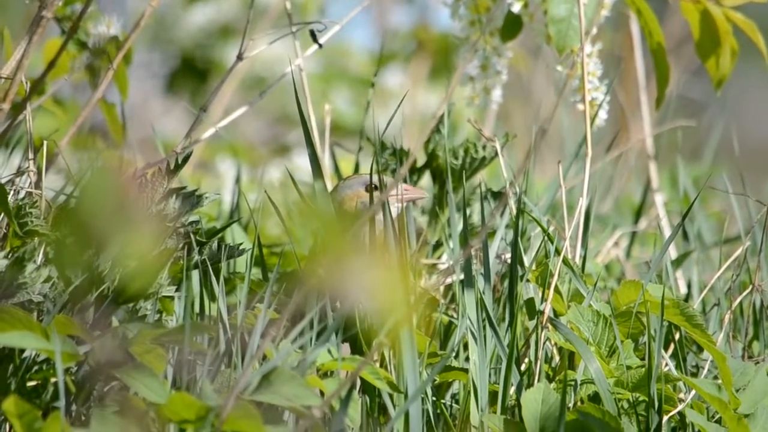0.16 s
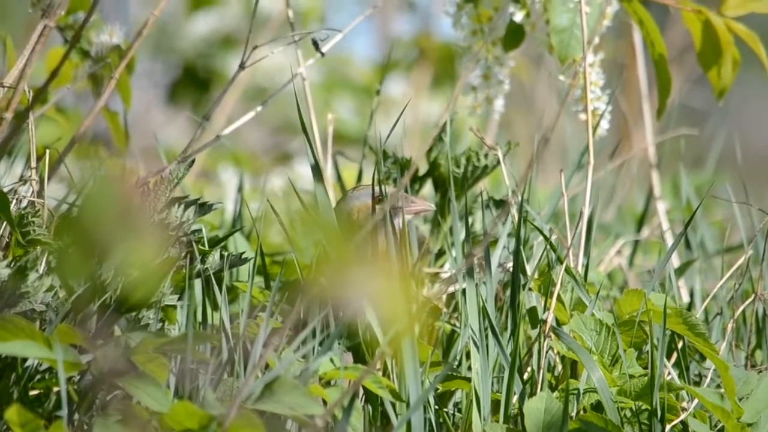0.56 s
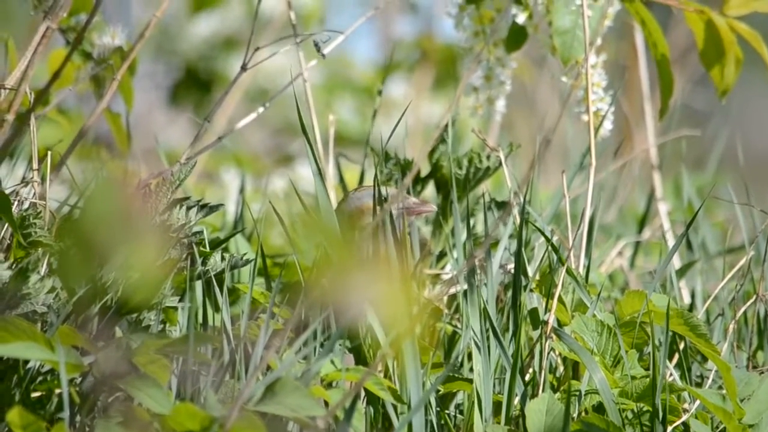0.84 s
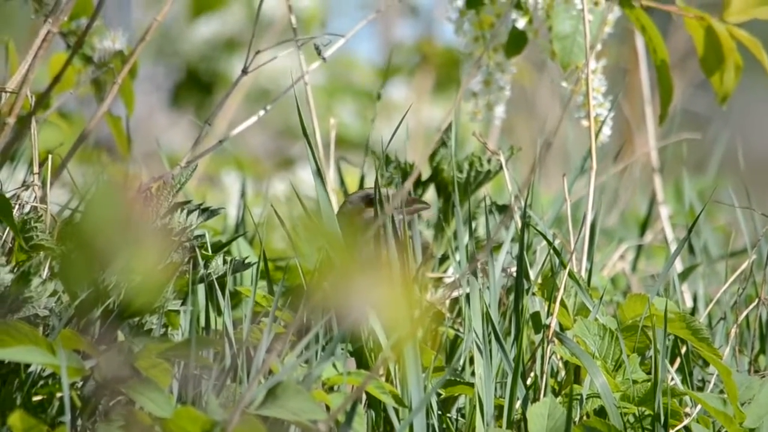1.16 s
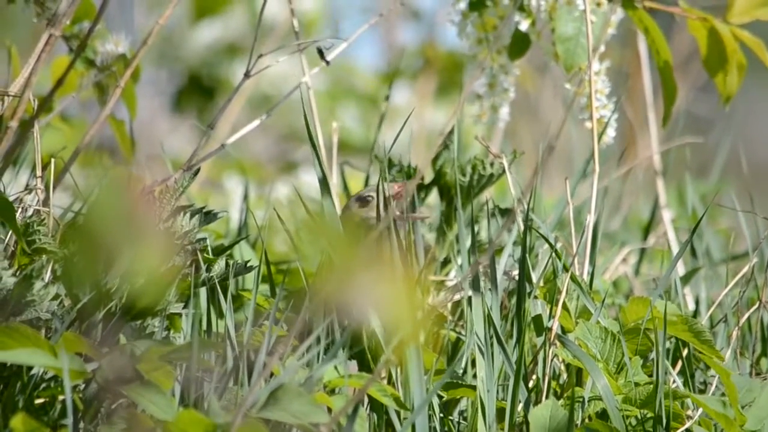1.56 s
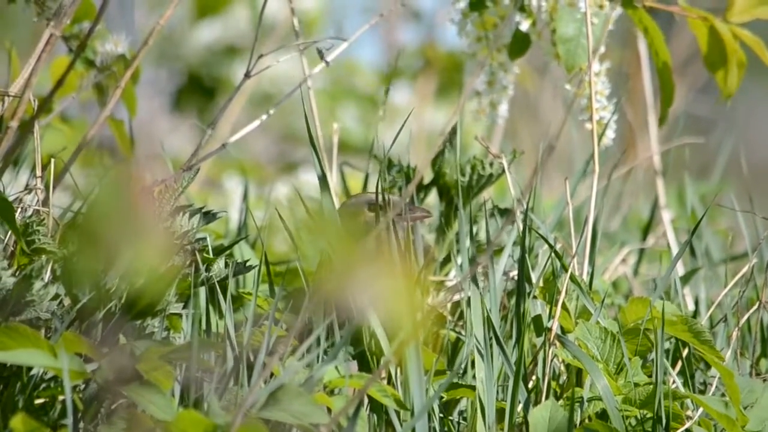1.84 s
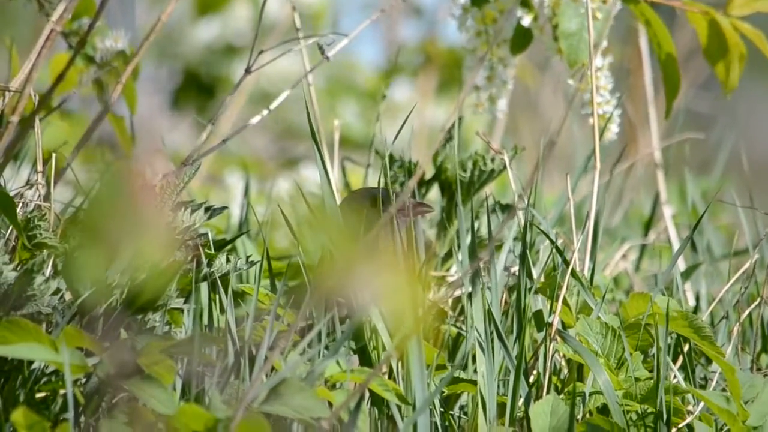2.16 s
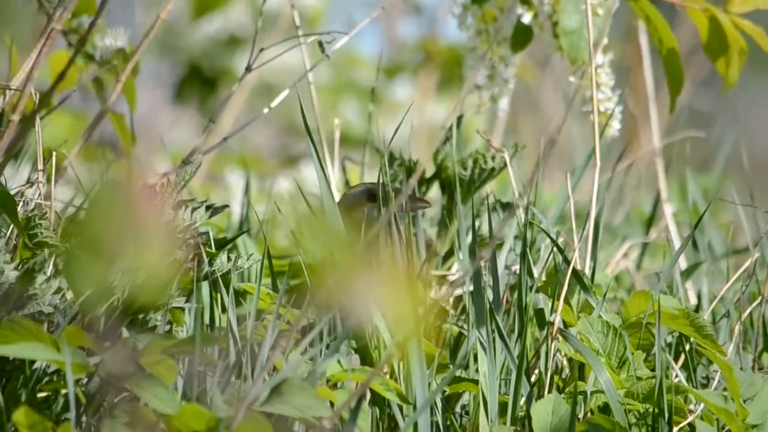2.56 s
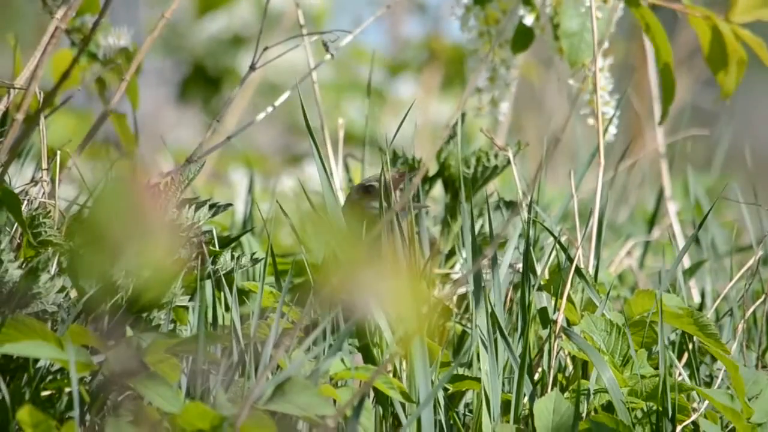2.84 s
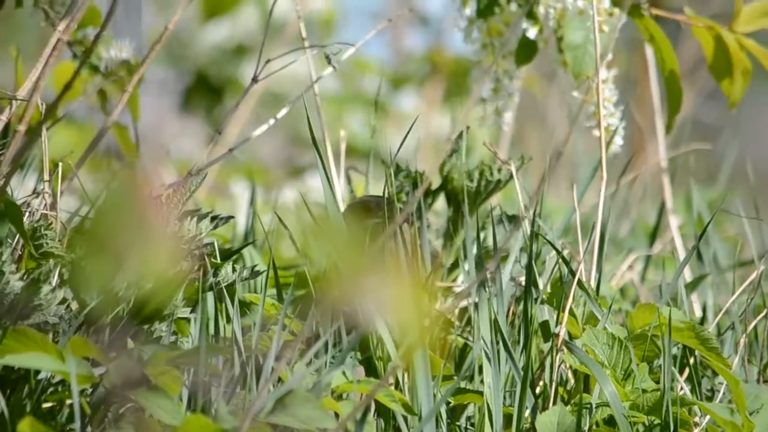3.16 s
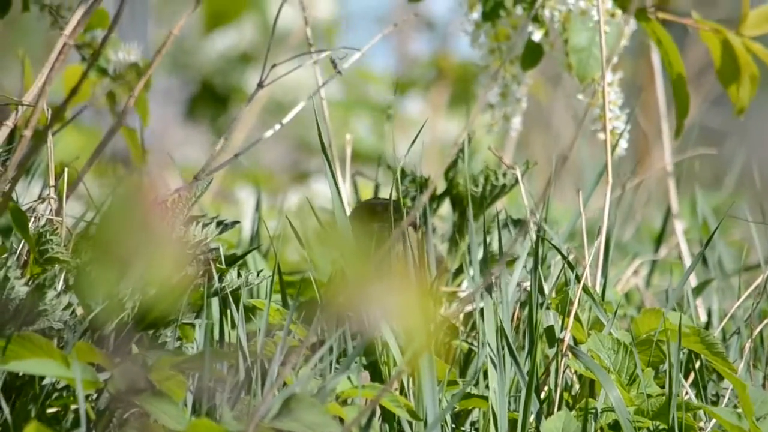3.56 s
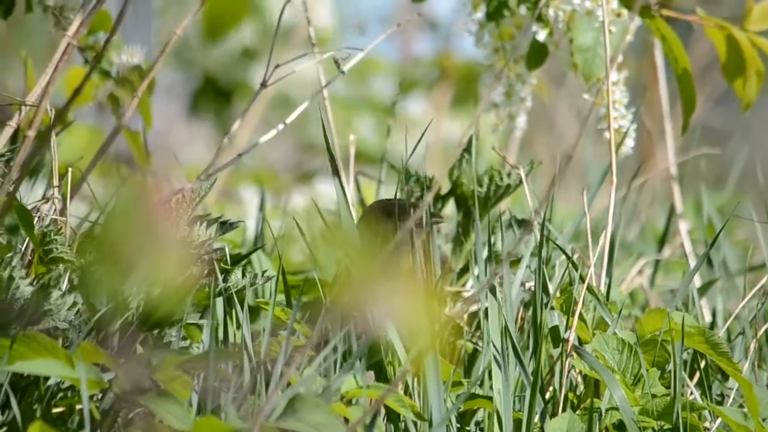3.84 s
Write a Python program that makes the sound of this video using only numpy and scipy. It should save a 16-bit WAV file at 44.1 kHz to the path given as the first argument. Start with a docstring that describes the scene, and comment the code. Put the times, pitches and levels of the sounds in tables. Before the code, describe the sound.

Dry, creaking rasps of a corncrake repeat six times over a quiet meadow hush.

```python
"""Corncrake in long grass

A corncrake rasps six calls: one alone, two pairs, then one more. Each is a limping run of about
twenty sharp double clicks that ring in the bird's throat and scatter among the stems. Behind it sit
a quiet outdoor hush, a few tiny chirps of a far bird and some soft low bumps."""
import sys
import numpy as np
from scipy import signal
from scipy.fft import rfft, irfft
from scipy.io import wavfile

SR = 44100
rng = np.random.default_rng(int(sys.argv[2]) if len(sys.argv) > 2 else 0)


def waveform_to_disk(signal):
    """Save audio, clipped to [-1, 1], as 16-bit WAV at the path in sys.argv[1]."""
    frames = np.transpose(np.atleast_2d(signal))
    scaled = np.clip(frames, -1, 1) * 32767
    samples = np.round(scaled).astype(np.int16)
    wavfile.write(sys.argv[1], SR, samples)


N = 176400

# Tone of the outdoor air: frequency_hz, gain_db
HUSH_EQ = [(25, -2), (60, -10.5), (100, -5), (160, -8), (350, -3), (650, -5), (1000, -7.5), (2200, -11),
           (2800, -13), (4200, -16.5), (4750, -14), (5300, -20), (6500, -21), (8200, -28.5), (9600, -29.5),
           (11000, -29)]
HUSH_DB, HUSH_WAVER_DB = -66, 1
# Soft low bumps: start_s, level_db, pitch_hz
LOW_BUMPS = [(.308, -54.5, 90), (0.899, -56, 104), (1.376, -58.5, 85.7), (1.874, -51, 100),
             (2.036, -49, 92)]
BUMP_RISE_S = .0034
# The far bird's chirps: start_s, length_s, first_hz, middle_hz, last_hz, level_db
FAR_CHIRPS = [(.540, .02, 3150, 2950, 2550, -66), (.670, .018, 3250, 2950, 2600, -65),
              (.864, .042, 4250, 4550, 5400, -68), (.897, .028, 5200, 5400, 5200, -69),
              (.982, .054, 4250, 3480, 4300, -65)]
# Tone of the scatter from the stems: frequency_hz, gain_db
GRASS_EQ = [(300, -6), (1200, -6.5), (2300, -0.5), (4000, -7.5), (6100, -6.5), (7500, -4.5), (10000, -3)]
GRASS_T60_S, GRASS_BUILD_S = .112, .0012
FAR_TAIL_DB, FAR_TAIL_T60_S = -50, .69

# The corncrake's calls: start_s, gain_db, mean_gap_ms, swell_db
CALLS = [(0.2742, -.1, 8.88, 3), (1.0429, -1.3, 8.89, 3.8), (1.5442, .9, 8.88, 3), (2.3305, -.9, 9.03, 4.3),
         (2.8276, 1.6, 8.89, 3), (3.6886, .4, 8.89, 3.5)]
# Length of each call: click_count
CLICKS_PER_CALL = [21, 19, 21, 19, 20, 19]
# The stumble that opens every call, against the mean gap: gap_ratio
STUMBLE_GAPS = [.70, .86, 1.24, .79, 1.19, .98, .97]
LIMP_DEPTH, LIMP_CLICKS, LAST_GAP_STRETCH, GAP_JITTER = .26, 10.5, 1.13, .025
SWELL_S, FADE_S, END_SLACK = .075, .035, .2
FIRST_CLICK_DB, CLICK_SPREAD_DB = -2, .92
REBOUND_MS, REBOUND_DB, REBOUND_JITTER = .81, -4.4, .025
BREATH_DB, BREATH_DECAY_MS = -18, .8
# Bands that lag within a click: centre_hz, width_hz
LAGGING_BANDS = [(2600, 900), (3600, 1100), (7600, 1500), (9300, 2200)]
# Throat resonances: centre_hz, width_hz, full_effort_gain_db, swell_db
THROAT_RESONANCES = [(992, 683, -23, -2), (1276, 220, -17.5, 0.5), (1874, 300, -9, -6.5),
                     (2293, 538, -19, -4.5), (3114, 324, -3.5, 4), (3895, 550, -14.5, 7.5),
                     (4536, 700, -7.5, 2.5), (5624, 796, -1.65, 1.5), (6314, 869, -3.5, 0.5),
                     (7317, 629, -15, 0.5), (8210, 330, -18, 2.5), (9190, 720, -17.5, 1.5),
                     (10070, 1070, -21, 0.5)]
THROAT_LOW_HZ, THROAT_HIGH_HZ, VOICE_GAIN_DB = 610, 11270, 14.5
CHEST_HZ, CHEST_WIDTH_HZ, CHEST_GAIN_DB = 193, 130, -34.5
CUTOFF_HZ = 11200


def from_db(db):
    """Decibels to gain."""
    return 10 ** (np.asarray(db) / 20)


def colour(x, eq):
    """Apply an EQ curve drawn through (frequency_hz, gain_db) points."""
    hz, db = np.transpose(eq)
    bin_hz = np.maximum(np.arange(len(x) // 2 + 1) * SR / len(x), 1)
    return irfft(rfft(x) * from_db(np.interp(np.log(bin_hz), np.log(hz), db)), len(x))


def unit_energy(x):
    """Scale to an energy of one."""
    return x / np.sqrt(np.sum(x ** 2))


def cut(x, hz, kind, order):
    """Butterworth high- or low-pass."""
    return signal.sosfilt(signal.butter(order, hz, kind, fs=SR, output="sos"), x)


def resonate(x, hz, width_hz):
    """One ringing band with unity gain at its peak."""
    r = np.exp(-np.pi * width_hz / SR)
    feedback = [1, -2 * r * np.cos(2 * np.pi * hz / SR), r * r]
    return signal.lfilter(np.array([1, 0, -1]) * (1 - r * r) / 2, feedback, x + 1e-18)


def add(out, start_s, sound):
    """Mix a short sound in at its cue."""
    i = int(start_s * SR)
    out[i:i + len(sound)] += sound[:max(N - i, 0)]


def hush():
    """A bed of outdoor air: dark noise whose level wavers slightly."""
    knots = rng.normal(0, HUSH_WAVER_DB, size=24)
    waver_db = np.interp(np.linspace(0, len(knots) - 1, N), np.arange(len(knots)), knots)
    air = unit_energy(colour(rng.standard_normal(N), HUSH_EQ)) * np.sqrt(N)
    return from_db(HUSH_DB + waver_db) * air


def bumps():
    """Dull knocks that die within a cycle or two."""
    out, t = np.zeros(N), np.arange(SR // 10) / SR
    for start_s, level_db, pitch_hz in LOW_BUMPS:
        envelope = t / BUMP_RISE_S * np.exp(1 - t / BUMP_RISE_S)
        add(out, start_s, -from_db(level_db) * envelope * np.sin(2 * np.pi * pitch_hz * t))
    return out


def far_bird():
    """Thin whistles, each bending through three pitches."""
    out = np.zeros(N)
    for start_s, length_s, *bend_hz, level_db in FAR_CHIRPS:
        progress = np.linspace(0, 1, int(length_s * SR))
        pitch_hz = np.polyval(np.polyfit([0, .5, 1], bend_hz, 2), progress)
        envelope = np.sqrt(4 * progress * (1 - progress))
        add(out, start_s, from_db(level_db) * envelope * np.sin(2 * np.pi * np.cumsum(pitch_hz) / SR))
    return out


def echo_tail(t60_s, build_s):
    """Dense echoes that build up and die away."""
    t = np.arange(SR) / SR
    return unit_energy(rng.standard_normal(SR) * from_db(-60 * t / t60_s) * (1 - np.exp(-t / build_s)))


def meadow(direct):
    """The space: direct sound, a short scatter among the stems and a faint far tail."""
    padded_scatter = np.r_[np.zeros(SR), echo_tail(GRASS_T60_S, GRASS_BUILD_S)]
    scatter = colour(padded_scatter, GRASS_EQ)[SR:]
    far_tail = from_db(FAR_TAIL_DB) * echo_tail(FAR_TAIL_T60_S, build_s=.077)
    return direct + signal.fftconvolve(direct, scatter + far_tail)[:N]


def limping_rhythm(count, mean_gap_ms):
    """Click times of one call: a stumble, a long-short limp that evens out, two slow last gaps."""
    k = np.arange(count - 1 - len(STUMBLE_GAPS))
    limp_fade = np.maximum(1 - (k / LIMP_CLICKS) ** 2, 0) * (1 - k / LIMP_CLICKS / 2)
    gaps = np.r_[STUMBLE_GAPS, 1 + LIMP_DEPTH * (-1.) ** k * limp_fade]
    gaps[-2:] = LAST_GAP_STRETCH
    return (np.r_[0, np.cumsum(gaps)] + rng.normal(0, GAP_JITTER, count)) * mean_gap_ms / 1000


def double_click():
    """A sharp snap and its softer rebound, over a tiny puff of breath."""
    ms = np.arange(SR // 200) / SR * 1000
    click = from_db(BREATH_DB) * unit_energy(rng.standard_normal(len(ms)) * np.exp(-ms / BREATH_DECAY_MS))
    click[0] += 1
    rebound_ms = REBOUND_MS * rng.normal(1, REBOUND_JITTER)
    click[np.argmin(abs(ms - rebound_ms))] += from_db(REBOUND_DB)
    return click


def click_runs():
    """Swelling runs of clicks, and the bird's slack: 1 as a call starts, 0 at full effort."""
    clicks, slack_points = np.zeros(N), []
    for (start_s, gain_db, mean_gap_ms, swell_db), count in zip(CALLS, CLICKS_PER_CALL):
        t = limping_rhythm(count, mean_gap_ms)
        slack = np.maximum(1 - t / SWELL_S, 0) + END_SLACK * np.maximum(1 - (t[-1] - t) / FADE_S, 0)
        slack_points += zip(start_s + t, slack)
        click_db = gain_db - swell_db * slack + rng.normal(0, CLICK_SPREAD_DB, count)
        click_db[0] += FIRST_CLICK_DB
        for click_s, gain in zip(start_s + t, from_db(click_db)):
            add(clicks, click_s, gain * double_click())
    return clicks, np.interp(np.arange(N) / SR, *np.transpose(slack_points))


def smear(x):
    """All-passes smear the attack: some bands of each click arrive a little late."""
    for hz, width_hz in LAGGING_BANDS:
        r = np.exp(-np.pi * width_hz / SR)
        feedback = [1, -2 * r * np.cos(2 * np.pi * hz / SR), r * r]
        x = signal.lfilter(feedback[::-1], feedback, x)
    return x


def corncrake():
    """The clicks ring in the throat, brighter with effort, and faintly in the chest."""
    clicks, slack = click_runs()
    throat = np.zeros(N)
    for k, (hz, width_hz, gain_db, swell_db) in enumerate(THROAT_RESONANCES):
        ring = resonate(resonate(clicks, hz, width_hz), hz, width_hz)  # twice, for steep slopes
        throat += (-1) ** k * from_db(gain_db - swell_db * slack) * ring
    throat = cut(smear(throat), THROAT_LOW_HZ, "high", order=4)
    throat = cut(throat, THROAT_HIGH_HZ, "low", order=10)
    chest_drive = cut(clicks, CHEST_HZ - CHEST_WIDTH_HZ / 2, "high", order=3)
    chest = resonate(chest_drive, CHEST_HZ, CHEST_WIDTH_HZ)
    return from_db(VOICE_GAIN_DB) * (throat + from_db(CHEST_GAIN_DB) * chest)


def scene():
    """The mono mix: both birds in the meadow, over the bumps and the hush."""
    return (meadow(corncrake() + far_bird()) + bumps() + hush())[None]


def record(dry):
    """A steep low-pass takes off the very top."""
    return signal.sosfilt(signal.ellip(8, .3, 70, CUTOFF_HZ, fs=SR, output="sos"), dry)


dry = scene()
out = record(dry)
waveform_to_disk(out)
```